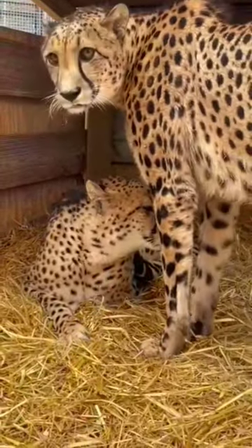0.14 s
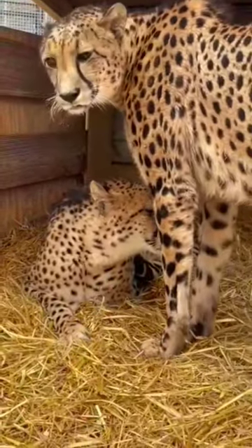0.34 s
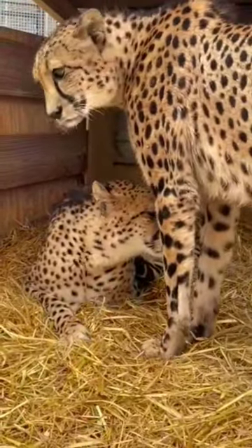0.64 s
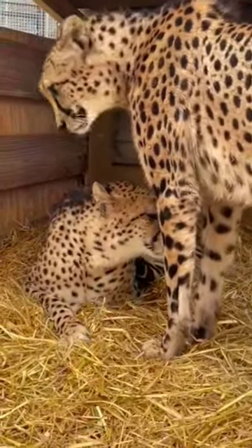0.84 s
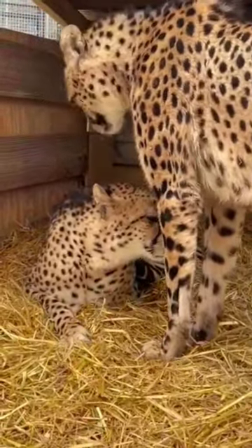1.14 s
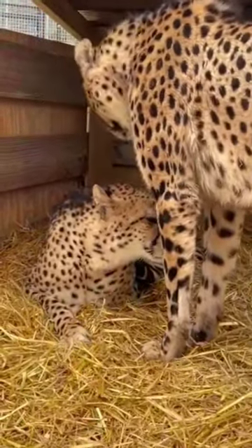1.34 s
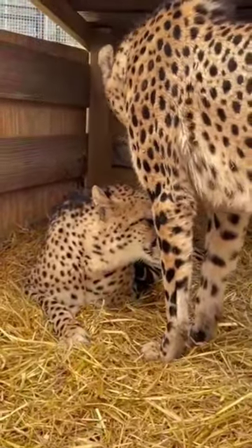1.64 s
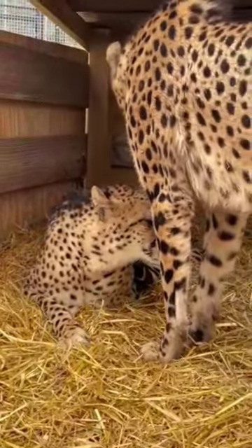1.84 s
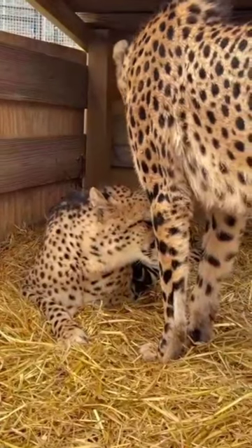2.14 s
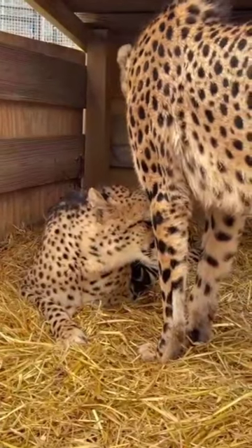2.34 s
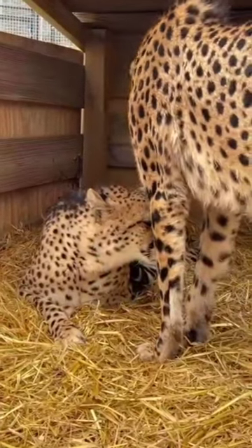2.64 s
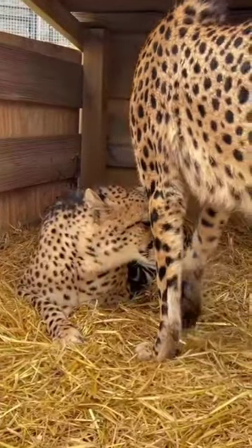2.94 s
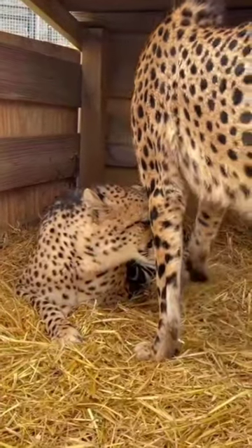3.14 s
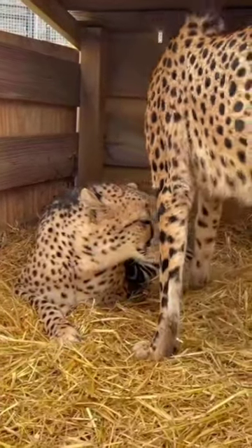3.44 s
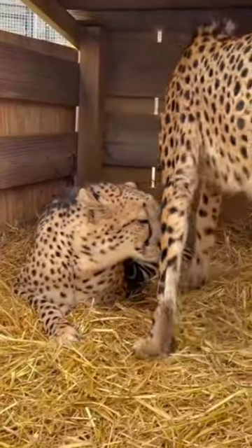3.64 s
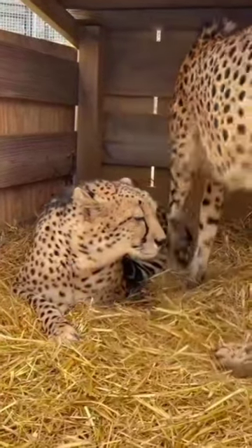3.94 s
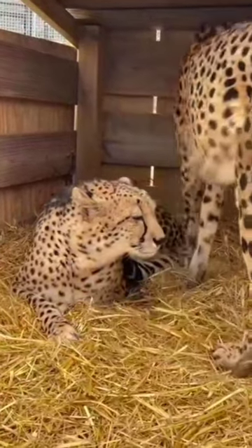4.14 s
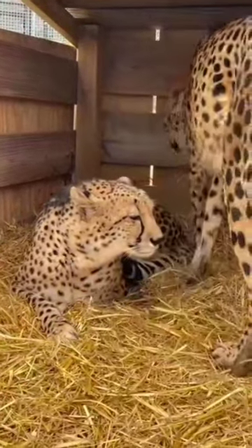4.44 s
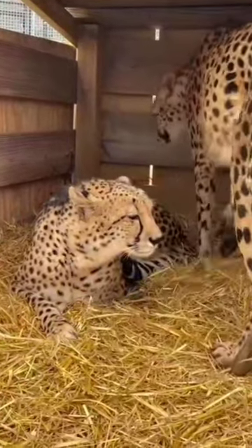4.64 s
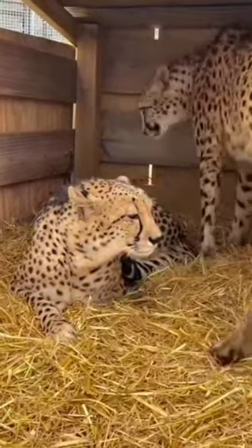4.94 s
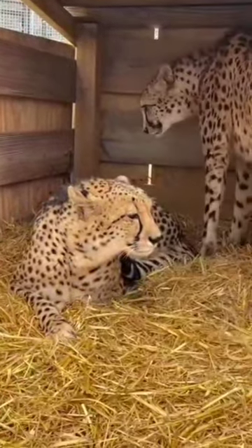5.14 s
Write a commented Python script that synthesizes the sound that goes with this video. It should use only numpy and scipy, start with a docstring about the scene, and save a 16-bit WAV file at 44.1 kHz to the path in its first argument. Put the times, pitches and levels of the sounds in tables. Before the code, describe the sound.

A big cat purrs in deep, fluttering strokes inside a small wooden shelter, while straw rustles and the purr swells into a throaty rattle.

```python
"""Two cheetahs in a small wooden shelter, close to a phone; straw rustles and air hisses from the outset. One
purrs in strokes, mostly near 25 flaps a second: each flap thumps the chest, booms in the shelter and rings
throat and airway. A softer, slower throb of low pulses runs beneath. Dry ticks, perhaps the other cheetah
purring, and a faint brush of noise join, then rushes of air in the throat. At about 3 s the steps through the
straw grow, each a rustle of tiny fractures, and growls ring; the purr ends at its loudest, opened into a
rattle."""
import sys
import numpy as np
from scipy import signal
from scipy.fft import rfft, irfft, next_fast_len
from scipy.io import wavfile

SR = 44100
rng = np.random.default_rng(int(sys.argv[2]) if len(sys.argv) > 2 else 0)


def to_wav(s):
    """Save 16-bit WAV."""
    ch = np.atleast_2d(s).T  # columns
    pcm = np.round(np.clip(ch, -1, 1) * 32767)  # PCM
    wavfile.write(sys.argv[1], SR, pcm.astype(np.int16))


N = 233068
TIME = np.arange(N) / SR
AGE = np.arange(4096) / SR  # time within one pulse or echo, s
LEFT_RIGHT = np.array([[1], [-1]])  # opposite signs at the two ears

# Spectra list (f/Hz, relative level/dB).
# Paws pressing and dragging through straw: (full from t/s, length/s, level/dB before flicker)
STEPS = [(0.0, 0.0077, -57.5), (0.13, 0.081, -66), (0.215, 0.091, -60), (0.347, 0.099, -62.5),
         (0.547, 1.12, -81.5), (1.536, 0.011, -71.5), (2.32, 0.01, -76.5), (3.155, 0.013, -54.5),
         (3.12, 0.15, -57.5), (3.407, 0.11, -49), (3.566, 0.095, -50.5), (3.715, 0.51, -54.5),
         (4.058, 0.085, -53), (4.155, 0.029, -49), (4.33, 0.04, -43.5), (4.416, 0.01, -52.5),
         (4.513, 0.1, -49.5), (4.688, 0.14, -58), (4.812, 0.056, -47.5), (4.865, 0.062, -44.5),
         (4.97, 0.083, -55), (5.087, 0.014, -49), (5.161, 0.16, -50.5)]
# Single stalks snapping: (t/s, level/dB before the straw's colouring)
SNAPS = [(0.033, -44.5), (0.369, -45), (0.764, -65), (0.827, -64), (1.196, -64.5), (1.54, -61),
         (2.002, -64), (2.331, -59.5), (2.601, -65), (3.089, -54), (3.163, -39), (3.389, -45.5),
         (3.443, -45), (3.949, -44.5), (4.083, -41.5), (4.3435, -33), (4.5097, -43.5), (4.878, -42)]
# Spectrum of the crisp rustle: (f/Hz, relative level/dB)
STRAW_SPECTRUM = [(1350, -9), (2300, -6), (3550, -6), (4480, -5.5), (4820, -12), (5140, -6.5), (5940, -4.5),
                  (7120, -1.5), (7940, -5.5), (8480, -5), (8920, -75), (9380, -30), (9800, -3), (11100, 4),
                  (11900, -2.5), (12400, -7), (13100, -24.5)]
# Spectrum of the rustle's dull body: (f/Hz, relative level/dB)
STRAW_BODY_SPECTRUM = [(250, -35), (500, 0), (1200, 20.5), (2100, 5.5), (2800, 3.5)]
# Relative level of the dull body, lower while the paw only skims the stalks: (t/s, level/dB)
STRAW_WEIGHT = [(3.95, -13), (4.03, -25), (4.3, -11)]
STRAW_WIDE_SPECTRUM = [(3000, -57), (4500, -9.5), (6500, -13.5), (9800, -5), (11500, -11)]
PRESS_S, PRESS_SHARE = 0.014, 0.016  # rise time of a rustle: a fixed part plus a share of its length
SETTLE_S = 0.053  # the straw settles after the paw stops
STRAW_FLICKER_DB, STRAW_FLICKER_PER_S = 1.3, 40  # stalks catch and slip

# Still air common to both ears: (f/Hz, relative level/dB)
AIR_SPECTRUM = [(120, -74), (200, 0.5), (350, -5), (514, -33), (1600, -23), (4800, -41), (7310, -32.5),
                (9010, -77), (10900, -106), (13000, -40)]
# Airy background that differs between the ears: (f/Hz, relative level/dB)
AIR_WIDE_SPECTRUM = [(100, -7), (200, -18), (320, 6.5), (600, 1), (1300, -4), (1800, -28.5), (3500, -31),
                     (4500, -18), (9000, -21), (13000, -22)]
AIR_DB, AIR_WIDE_DB = -67, -77.5

# Purr strokes: (first flap t/s, last flap t/s, nominal rate/(flaps per s), share by which spacing grows,
#   attack/s, release/s, crescendo/dB, chest level/dB, boom level/dB, throat level/dB, rasp level/dB,
#   throat f/Hz, mouth opening 0-1, throat roughness 0-1, air leak 0-1)
STROKES = [ (0.025, 0.169, 22, 0.086, 0.0061, 0.0094, -3.5, -39.5, -48, -66, -77, 364, 0.5, 0.64, 0.58),
           (0.45, 0.814, 21.8, 0.026, 0.14, .01, 10, -53.5, -58.5, -70, -80, 417, 0.01, 0.48, 0.16),
           (0.875, 1.041, 25.2, -0.084, 0.088, 0.11, 6.5, -40.5, -50.5, -47, -60, 391.4, 0.37, 0.6, 0.53),
           (1.097, 1.304, 23.8, -0.016, 0.17, 0.071, 3, -42, -53, -47, -58, 405, 0.38, 0.72, 0.52),
           (1.347, 1.6, 24, 0.012, .01, .01, 14, -45, -53.5, -68, -73, 372, 0.34, 0.7, 0.76),
           (1.642, 2.351, 24.1, -0.032, 0.013, 0.028, 6, -35, -42.5, -56.5, -63.5, 353, 0.14, 0.34, 0.44),
           (2.384, 2.831, 20.4, 0.028, 0.0084, 0.014, -11, -45.5, -49.5, -74, -81, 343, 0.4, 0, 0.56),
           (2.887, 2.957, 29, 0.085, 0.053, .01, 1.5, -44.5, -47.5, -47.5, -54.5, 405.7, 0.65, 0.83, 0.12),
           (3.001, 3.284, 23.4, .14, .01, 0.028, 0.5, -38.5, -44, -38, -53, 380, 0.4, 0.4, 0.29),
           (3.443, 3.614, 28, -0.1, 0.01, 0.011, -2.5, -37, -46.5, -51, -79, 353.5, 0.38, 0.43, 0.7),
           (3.673, 3.987, 34.08, 0.22, 0.024, 0.096, -4, -38.5, -46.5, -51.5, -63, 353.5, 0.44, 0.59, 0.91),
           (4.047, 4.126, 44.7, 0.0061, 0.05, .01, 4, -50, -45.5, -56, -86, 346, 0.35, 0.46, 0.87),
           (4.165, 4.565, 28.2, 0.11, 0.077, 0.014, -6, -32.5, -46, -37, -48, 367.8, 0.6, 0.38, .12),
           (4.605, 5.068, 26.6, 0.0031, .01, .01, 3, -34.5, -45.5, -32, -46, 361.2, 0.66, 0.25, 0.16),
           (5.106, 5.271, 24, 0.027, .01, .01, 0.5, -36.5, -45.5, -30, -46, 360, 0.79, 0.28, 0.16)]
# Flaps that slap harder or softer than their neighbours: (t/s, extra rasp level/dB)
SLAPS = [(0.876, 7), (0.96, 6.5), (1.1, 5.5), (1.18, 4.5), (1.304, -3), (1.684, 6), (1.728, 2), (1.94, 2),
         (2.35, -7), (2.525, 2), (2.92, 2), (2.956, 3), (3.04, 5), (3.079, 4.5), (3.154, -4.5),
         (3.283, 6.5), (4.238, 3), (4.565, 6), (4.722, 3.5), (4.798, 5), (5.031, 4.5), (5.148, 3),
         (5.188, 3.5)]
# Alternation of strong and weak flaps: (t/s, level/dB taken from even flaps and given to odd ones)
LIMP = [(4.24, -1), (4.28, 5), (4.31, 3.5), (4.49, 6.5), (4.6, -2), (4.72, 3.5), (4.84, 3.5), (4.92, 2),
        (5.2, 0.5)]
# Surge and sag of the push on the throat: (t/s, relative level/dB)
PUSH = [(0.9, -1), (0.96, -0.5), (1.1, -1.5), (1.22, -1), (1.27, -5.5), (3.0, 0), (3.06, 4.5), (3.15, -4),
        (3.2, -0.5), (3.3, -3), (4.16, -2)]
# Airway resonances with the mouth open: (f/Hz, width/Hz, relative level/dB)
MOUTH = [(613.9, 34, 5), (853.6, 55, -7.5), (973, 42, 2), (1117, 58, 9), (1445, 165, -2), (1815, 89, 5.5)]
# Airway resonances through the nose: (f/Hz, width/Hz, relative level/dB)
NOSE = [(432.6, 32, 13.5), (725, 110, -19), (1240, 290, -5), (1560, 342, 10.5), (1636, 333, 11),
        (1865, 123, 0.5), (2100, 2300, -13)]
# Faint wet tick of the open mouth: (f/Hz, width/Hz, relative level/dB)
TICK = [(6750, 1600, -22), (6440, 140, 12.5)]
SLAP_TRAIN_DB = np.array([-11.5, -22.0, -18.5, -26.0])  # mean relative levels of a flap's four slaps
# fall of each part at the soft ends of a stroke
CHEST_SINK_DB, BOOM_SINK_DB, THROAT_SINK_DB, RASP_SINK_DB = 2.5, 4, 13.5, 12.5
ONSET_S = 0.018  # the push begins this long before the first flap and outlasts the last
CHEST_ARCH_DB = 5.5  # the chest heaves this much less at the ends of a stroke than in its middle
NOSE_HZ, NOSE_WANDER = 1556, 0.081  # nasal chirp; relative shift of the nose's resonances between flaps
# upper resonance that dips as the folds close and rises as they part
GLIDE_HZ, GLIDE_DIP, GLIDE_WANDER, GLIDE_DB = 1869, 0.299, 0.039, -6
GLIDE_AT_S, GLIDE_DIP_S, GLIDE_LENGTH_S = .0058, .0022, .0045

# Slow throb: (t/s, rate/(beats per s), level/dB)
THROB = [(.06, 10.15, -46), (.65, 10.55, -44), (1.0, 10.9, -48), (1.5, 10.2, -44), (2.6, 13.1, -46),
         (2.9, 13.26, -46), (5.28, 16.7, -50)]
RUMBLE_SPECTRUM = [(15, -64), (35, -22.0), (55, 6.0), (130, 5.5), (220, -6.5), (450, -23.5), (1500, -48.0)]

# Runs of dry ticks: (first t/s, last t/s, rate/(1/s), build-up/s, rise time/s, level/dB, low-pass f/Hz)
DRY_TICKS = [(0.450, 0.9, 22.2, 0.024, .004, -69.5, 5100), (0.949, 1.037, 22.5, .005, 0.0042, -70, 2720),
             (1.086, 1.264, 22.2, 0.026, 0.0071, -70.5, 2670), (3.845, 3.987, 21, 0.0055, 0.009, -59, 2002)]
# Spectrum of a dry tick before its low-pass: (f/Hz, relative level/dB)
DRY_TICK_SPECTRUM = [(300, 1), (700, -4.5), (1300, 9.5), (2100, 7), (2700, -1), (4400, -13.5)]
# Hiss of the turning head: (rise held back until t/s, fall from t/s, fade/s, level/dB);
# rise and fall overlap, so it peaks where the fall begins, about 14 dB below the listed level
BRUSH = (2.5, 0.84, 0.5, -62.5)
# Spectrum of that hiss: (f/Hz, relative level/dB)
BRUSH_SPECTRUM = [(300, -9), (600, 6), (1050, 9), (2200, 0), (3000, -16), (7000, -29), (12000, -29)]
# Air rushing through the throat: (start t/s, end t/s, fade/s, centre f/Hz, width/Hz, level/dB)
RUSHES = [(0.95, 0.98, 0.014, 1680, 1380, -68), (1.283, 1.41, 0.045, 1550, 1580, -75),
          (1.46, 1.50, 0.043, 1000, 160, -70.5), (0.91, 1.303, 0.034, 1310, 1500, -74),
          (1.683, 1.824, .03, 2430, 1100, -75.5), (1.655, 2.323, 0.034, 1560, 810, -72),
          (1.716, 1.853, 0.022, 2000, 252, -72), (1.737, 1.755, .008, 850, 596, -64.5),
          (1.995, 2.009, .012, 2140, 1080, -65.5), (2.164, 2.189, 0.0089, 680, 300, -65.5),
          (3.01, 3.204, 0.079, 1910, 1090, -67)]
# Growls: (start t/s, end t/s, level/dB)
GROWLS = [(2.90, 3.30, -56), (4.50, 4.78, -56)]
# Resonances of the slack back of the throat: (f/Hz, width/Hz, relative level/dB)
PHARYNX = [(482, 60, 0.5), (599, 37, 1), (705, 29, 3), (797, 36, 4)]

ECHO_MID_SPECTRUM = [(250, -17), (500, 8), (1000, 3.5), (3000, 1.0), (9000, 27.0)]
ECHO_SIDE_SPECTRUM = [(150, -54.0), (350, -69), (600, 3.0), (1200, -17.0), (1900, -66), (9000, 6)]
PHONE_BASS = [(15, -32), (26, -19), (38, -8), (52, 0)]
PHONE_TOP_HZ = 13000


def undb(db):
    """A level in decibels corresponds to a gain of 10^(level/20)."""
    return 10 ** (np.asarray(db) / 20)


def unit(x):
    """Normalisation brings a signal to rms 1."""
    return x / np.sqrt(np.mean(x ** 2))


def add(track, at, sound):
    """Superposition: a sound is summed into a track from a time on."""
    i = int(at * SR)
    a, b = max(i, 0), min(i + len(sound), N)
    if b > a:
        track[a:b] += sound[a - i:b - i]


def colour(x, points):
    """Linear filtering multiplies the spectrum by a response, interpolated over log frequency."""
    hz, db = np.transpose(points)
    size = next_fast_len(N + len(AGE))
    f = np.maximum(np.fft.rfftfreq(size, 1 / SR), 1)
    gain = undb(np.interp(np.log(f), np.log(hz), db))
    return irfft(rfft(x, size) * gain, size)[:N]


def gate(start, end, rise_s, fall_s):
    """Exponential growth up to the start, a plateau, and exponential decay after the end."""
    growth = np.minimum(TIME - start, 0) / max(rise_s, 1e-4)
    decay = np.maximum(TIME - end, 0) / max(fall_s, 1e-4)
    return np.exp(growth - decay)


def swell(rise_s, order):
    """A gamma envelope peaks at 1 after rise_s and decays; a higher order is more compact."""
    return (AGE / rise_s * np.exp(1 - AGE / rise_s)) ** order


def ring(hz, rise_s, order, turn=0):
    """A resonance builds up and decays at its own frequency; turn is its phase in cycles."""
    return swell(rise_s, order) * np.sin(2 * np.pi * (hz * AGE + turn))


def modes(table):
    """A resonator's impulse response is a sum of decaying sinusoids, here with alternating signs."""
    response = np.zeros(len(AGE))
    for k, (hz, width, db) in enumerate(table):
        decay = np.exp(-np.pi * width * AGE)
        response += (-1) ** k * undb(db) * width * decay * np.sin(2 * np.pi * hz * AGE)
    return unit(response)


def hiss(rise_s, order):
    """Turbulence is random pressure, here noise under a gamma envelope."""
    return unit(rng.standard_normal(len(AGE)) * swell(rise_s, order))


def sized(pulse, db, rate):
    """The mean power of a pulse train fixes the size of one pulse at a given level and rate."""
    return unit(pulse) * undb(db) * np.sqrt(SR / rate / len(pulse))


def flicker(per_s):
    """A random level follows straight lines between independent normal values."""
    knots = np.arange(0, TIME[-1] + 1, 1 / per_s)
    return np.interp(TIME, knots, rng.standard_normal(len(knots)))


def crackle(spread_db, per_s):
    """Friction noise: dense tiny fractures of very unequal size over a smooth sliding hiss."""
    sizes = undb(spread_db * np.minimum(rng.exponential(size=N), 5))
    grains = (rng.random(N) < per_s / SR) * sizes * rng.standard_normal(N)
    return unit(unit(grains) + 1.27 * rng.standard_normal(N))


def straw():
    """Stick-slip and fracture: stalks slide and crack with the weight on them; a few snap alone."""
    power = np.zeros(N)
    for at, length, db in STEPS:
        press = gate(at, at + length, PRESS_S + PRESS_SHARE * length, SETTLE_S)
        power += (undb(db) * press) ** 2
    tread = np.sqrt(power) * undb(STRAW_FLICKER_DB * flicker(STRAW_FLICKER_PER_S))
    snaps = np.zeros(N)
    for at, db in SNAPS:
        add(snaps, at, undb(db) * rng.standard_normal(len(AGE)) * swell(0.0028, order=1))
    crisp = unit(colour(crackle(2.3, 1500), STRAW_SPECTRUM)) * tread
    weight = undb(np.interp(TIME, *np.transpose(STRAW_WEIGHT)))
    body = weight * unit(colour(crackle(1.0, 900), STRAW_BODY_SPECTRUM)) * tread
    wide = colour(unit(colour(crackle(2.2, 2500), STRAW_SPECTRUM)), STRAW_WIDE_SPECTRUM) * tread
    return crisp + colour(snaps, STRAW_SPECTRUM) + body + wide * LEFT_RIGHT


def still_air():
    """Stationary background noise has a part common to both ears and a part opposite in sign."""
    air = undb(AIR_DB) * unit(colour(rng.standard_normal(N), AIR_SPECTRUM))
    wide_air = undb(AIR_WIDE_DB) * unit(colour(rng.standard_normal(N), AIR_WIDE_SPECTRUM))
    return air + wide_air * LEFT_RIGHT


def flap_times(first, last, rate, slowing):
    """Flow drives the repetition: spacing grows evenly as air runs out, or shrinks as it is pushed."""
    u = np.linspace(0, 1, int(round((last - first) * rate)) + 1)
    return first + (last - first) * u * (1 - slowing * (1 - u) / 2)


def chest_thump():
    """Forced vibration: a flap sets the chest wall heaving near 61 Hz."""
    return ring(61 * (1 + 0.18 * rng.standard_normal()), 0.013, order=3, turn=-0.5)


def shelter_boom():
    """Cavity resonance: a flap excites the shelter near 146 Hz."""
    pitch, phase = rng.standard_normal(2)
    return ring(146 * (1 + 0.14 * pitch), 0.011, order=2, turn=0.14 * phase)


def throat_ring(hz, rough, leak):
    """Resonance and nonlinearity: a rough throat adds its octave and eddies, lingering in slack folds."""
    hz = hz * np.exp((.008 + .035 * rough) * rng.standard_normal())
    tone = unit(ring(hz, 0.014, order=5, turn=0.14 * rng.standard_normal()))
    octave = unit(ring(2 * hz, 0.013, order=6, turn=rng.random()))
    turbulence = hiss(.0115 + .008 * leak, order=8 - 6 * leak)
    eddies = signal.fftconvolve(turbulence, ring(1.05 * hz, .0017, order=1))[:len(AGE)]
    return tone + rough * (undb(-19.5) * octave + 2.15 * rough * unit(eddies))


def flap_air(hz, leak):
    """Pulsed flow: a puff and four uneven slaps, spaced by the throat's period; slack folds leak air."""
    slaps = np.zeros(len(AGE))
    at = (np.arange(1, 5) + .5 + 0.092 * rng.standard_normal(4)) / hz
    places = np.clip(at * SR, 0, len(AGE) - 1).astype(int)
    slaps[places] = undb(SLAP_TRAIN_DB + 4.2 * rng.standard_normal(4))
    reopening = leak * hiss(0.04, order=30)  # a softer puff about 34 ms after the first
    return hiss(0.0057, order=3) + unit(slaps) + reopening + 2 * leak ** 2 * hiss(0.0056, order=3)


def nasal(shift):
    """Resonance scales with size: the closed muzzle rings slightly differently on each flap."""
    return modes([(hz * shift, width, db) for hz, width, db in NOSE])


def nasal_chirps(shift, leak):
    """Double excitation: a chirp as the folds close, a weaker one at its own pitch 23 ms later."""
    again = np.exp(NOSE_WANDER * rng.standard_normal())
    closing = unit(ring(NOSE_HZ * shift, 0.0063, order=7))
    reopening = unit(ring(NOSE_HZ * again, 0.0293, order=100))
    return closing + 0.39 * leak * reopening


def glide():
    """A moving boundary retunes a resonance: pitch falls as the folds close and rises as they part."""
    dip_time, pitch, phase = rng.standard_normal(3)
    since = AGE - GLIDE_AT_S
    dip = GLIDE_DIP * np.exp(-(since / GLIDE_DIP_S + .5 * dip_time) ** 2)
    hz = GLIDE_HZ * np.exp(GLIDE_WANDER * pitch) * (1 - dip)
    envelope = np.exp(-(since / GLIDE_LENGTH_S) ** 2)
    return unit(envelope * np.sin(2 * np.pi * (np.cumsum(hz) / SR + phase)))


def airway_rasp(throat_hz, opening, leak, mouth, tick, soft_tissue):
    """Source and filter: flap air excites mouth and nose, weighted by the mouth's opening."""
    shift = np.exp(NOSE_WANDER * (1 - opening) * rng.standard_normal())
    nose = unit(signal.sosfilt(soft_tissue, nasal(shift)))
    airway = opening * mouth + (1 - opening) * nose + opening ** 4 * tick
    rasp = unit(signal.fftconvolve(flap_air(throat_hz, leak), airway)[:len(AGE)])
    chirps = 1.46 * (1 - opening) ** 3 * nasal_chirps(shift, leak)
    return rasp + chirps + opening * undb(GLIDE_DB) * glide()


def purr():
    """Coupled resonators: each flap of the larynx drives chest, shelter, throat and upper airway."""
    out = np.zeros(N)
    soft_tissue = signal.butter(10, 2060, fs=SR, output="sos")
    mouth = unit(signal.sosfilt(soft_tissue, modes(MOUTH)))
    tick = undb(-40.0) * modes(TICK)
    for (first, last, rate, slowing, attack, release, crescendo, chest_db, boom_db, throat_db, rasp_db,
         throat_hz, *shares) in STROKES:
        opening, rough, leak = np.clip(shares, 0, 1)
        for k, at in enumerate(flap_times(first, last, rate, slowing)):
            timing, limp, chest_luck, boom_luck, rasp_luck = rng.standard_normal(5)
            # one effort moves all four parts
            effort = np.clip(min((at - first + ONSET_S) / attack, (last - at + ONSET_S) / release), 0, 1)
            slack = 1 - effort
            along = (at - first) / (last - first) - .5
            grown_db = crescendo * along
            arch_db = -CHEST_ARCH_DB * (2 * along) ** 2
            slap_db = sum(db for when, db in SLAPS if abs(when - at) < .5 / rate)
            at = at + 0.00501 * leak ** 2 * timing  # slack folds keep poor time
            limp_db = -np.interp(at, *np.transpose(LIMP)) * (-1) ** k + .7 * limp
            push_db = np.interp(at, *np.transpose(PUSH))

            level_db = chest_db + grown_db + arch_db - CHEST_SINK_DB * slack + chest_luck
            add(out, at - .0195, sized(chest_thump(), level_db, rate))
            level_db = boom_db + grown_db - BOOM_SINK_DB * slack + 0.82 * boom_luck
            add(out, at - .002, sized(shelter_boom(), level_db, rate))
            level_db = throat_db + grown_db + push_db - THROAT_SINK_DB * slack + limp_db
            add(out, at - .009, sized(throat_ring(throat_hz, rough, leak), level_db, rate))
            add(out, at - .007, growl(at, rate))
            rasp = airway_rasp(throat_hz, opening, leak, mouth, tick, soft_tissue)
            uneven_db = 0.098 * limp_db + (0.39 + 0.85 * rough) * rasp_luck
            level_db = rasp_db + slap_db - RASP_SINK_DB * slack + uneven_db
            add(out, at - .0068, sized(rasp, level_db, rate))
    return out


def beats(curve):
    """Phase is the integral of rate: a curve (t/s, rate, ..) is read once at each whole cycle."""
    s, *columns = np.transpose(curve)
    t = np.arange(s[0], s[-1] + 1 / columns[0][-1] / 2, 1 / SR)
    cycles = np.cumsum(np.interp(t, s, columns[0])) / SR
    times = np.interp(np.arange(int(cycles[-1]) + 1), cycles, t)
    return np.transpose([times] + [np.interp(times, s, c) for c in columns])


def throb():
    """Damped low resonance: soft thumps, 10 to 17 a second, perhaps the resting animal, over a rumble."""
    out = np.zeros(N)
    for at, rate, db in beats(THROB):
        pitch, phase, loudness = rng.standard_normal(3)
        thump = ring(80 * (1 + 0.075 * pitch), 0.016, order=3, turn=0.2 * phase)
        add(out, at - .009, sized(thump, db + 1.4 * loudness, rate))
    return out + undb(-51) * unit(colour(rng.standard_normal(N), RUMBLE_SPECTRUM))


def dry_ticks():
    """Transients without pitch: short dry noise bursts in runs of about 22 a second, perhaps the flaps of the
    second cheetah's own purr."""
    out = np.zeros(N)
    for first, last, rate, build_s, length_s, db, dull_hz in DRY_TICKS:
        run = np.zeros(N)
        for at in flap_times(first, last, rate, 0):
            effort = min((at - first + ONSET_S) / max(build_s, 1e-3), 1)
            loudness = undb(1.4 * rng.standard_normal())
            add(run, at - length_s, effort * loudness * hiss(length_s, order=2))
        low_pass = signal.butter(3, dull_hz, fs=SR, output="sos")
        run = signal.sosfilt(low_pass, colour(run, DRY_TICK_SPECTRUM))
        out += undb(db) * unit(run) * np.sqrt((last - first) * SR / N)  # level holds over the run
    return out


def brush():
    """Friction noise: a faint, soft hiss as the standing animal lowers its head and turns away."""
    start, end, fade_s, db = BRUSH
    noise = unit(colour(crackle(3.0, 900), BRUSH_SPECTRUM))
    return undb(db) * gate(start, end, 2 * fade_s, fade_s) * noise


def rushes():
    """Turbulence through a resonator: air swells in one broad resonance of the airway."""
    out = np.zeros(N)
    for start, end, fade_s, hz, width, db in RUSHES:
        edges = [max(hz - width / 2, 100), hz + width / 2]
        band = signal.butter(2, edges, "bandpass", fs=SR, output="sos")
        noise = unit(signal.sosfilt(band, crackle(3.5, 1500)))
        out += undb(db) * gate(start, end, fade_s, fade_s) * noise
    return out


def growl(at, rate):
    """Free decay: the pharynx, shaken by a puff of air, rings on after a flap within a growl."""
    ringing = signal.fftconvolve(hiss(0.0062, order=4), modes(PHARYNX))[:len(AGE)]
    out = np.zeros(len(AGE))
    for start, end, db in GROWLS:
        if start < at < end:
            out += sized(ringing, db, rate)
    return out


def shelter(x, t60_s, wet_db):
    """Reverberation: near planks give a short, dense echo that the straw soon absorbs."""
    # the echo begins after 9 ms; wet_db applies before its colouring
    tail = rng.standard_normal((2, len(AGE))) * undb(-60 * AGE / t60_s) * (AGE > .009)
    mid, side = (signal.fftconvolve(x, h / np.linalg.norm(h))[:N] for h in tail)
    mid = colour(mid, ECHO_MID_SPECTRUM)
    side = colour(side, ECHO_SIDE_SPECTRUM)
    return x + undb(wet_db) * (mid + side * LEFT_RIGHT)


def scene():
    """Superposition: the voice reverberates in the shelter, over straw, throb and still air."""
    voice = shelter(purr() + dry_ticks() + rushes(), t60_s=.11, wet_db=-12)
    return straw() + still_air() + voice + throb() + brush()


def record(dry):
    """Band limitation: the phone drops the deepest bass and cuts the top."""
    thinned = np.array([colour(x, PHONE_BASS) for x in dry])
    return signal.sosfilt(signal.ellip(8, .2, 70, PHONE_TOP_HZ, fs=SR, output="sos"), thinned)


dry = scene()
out = record(dry)
to_wav(out)
```